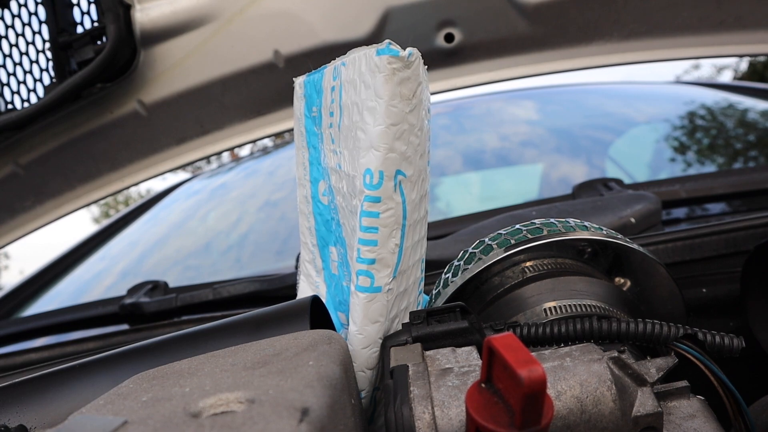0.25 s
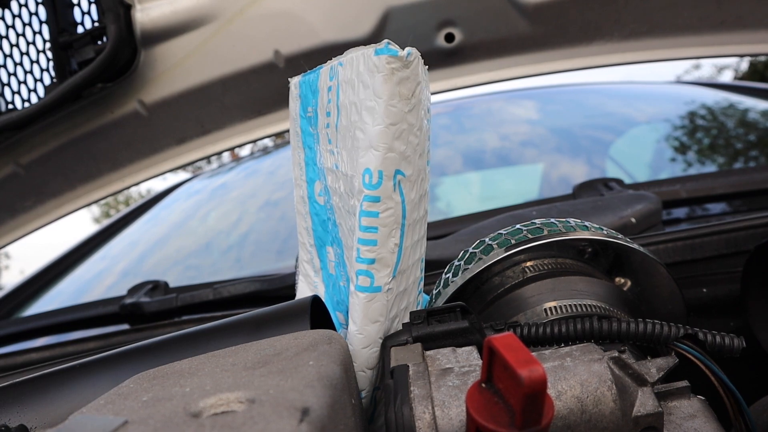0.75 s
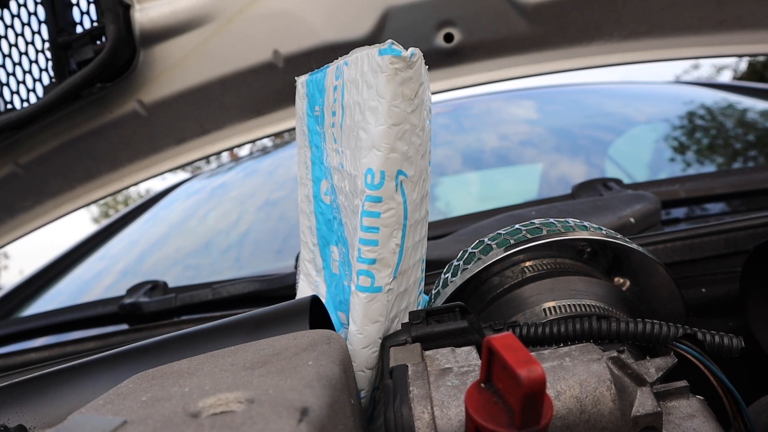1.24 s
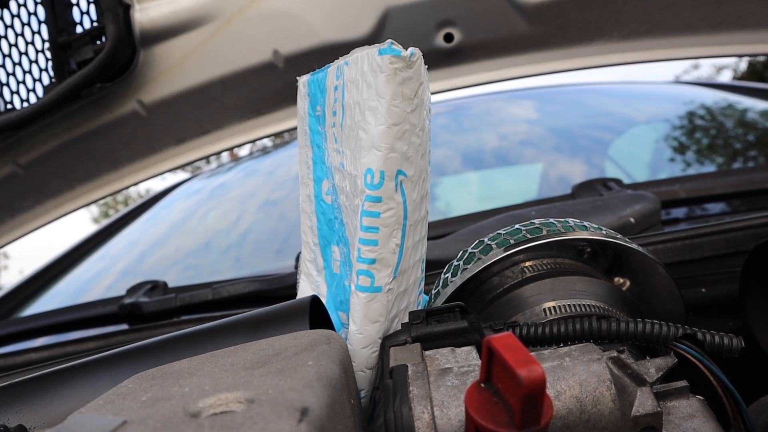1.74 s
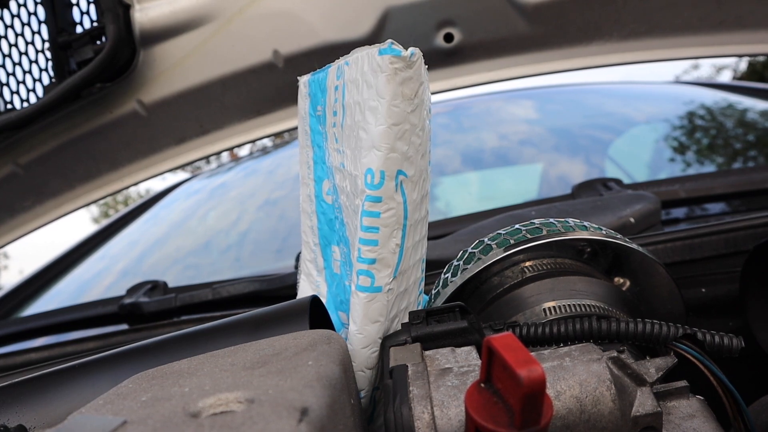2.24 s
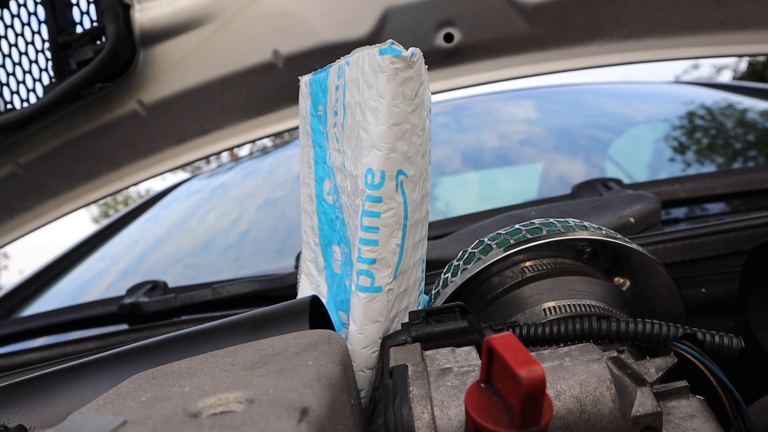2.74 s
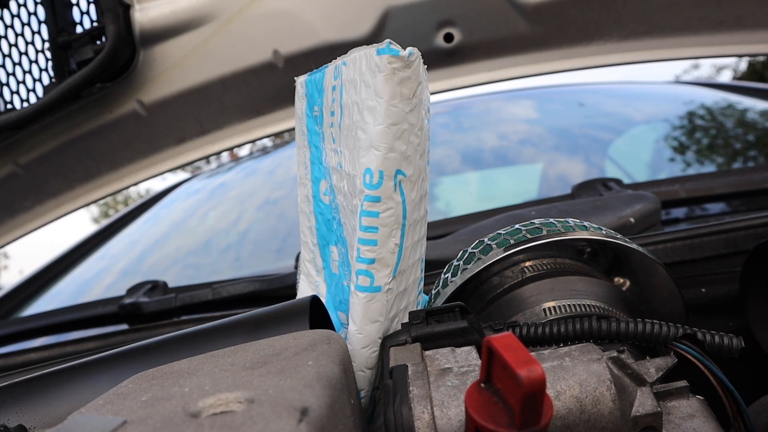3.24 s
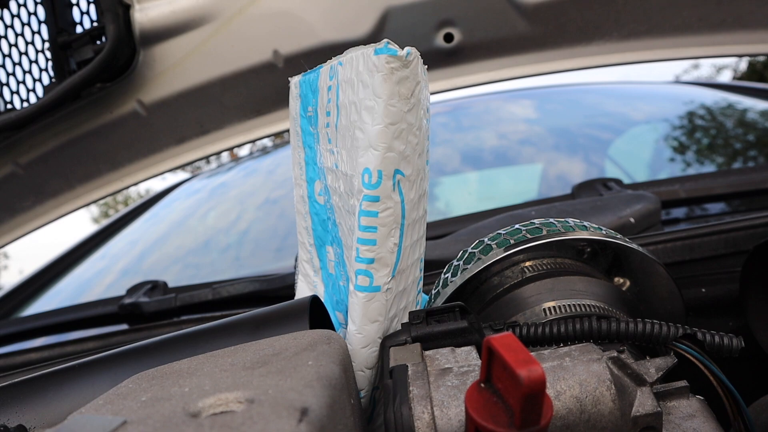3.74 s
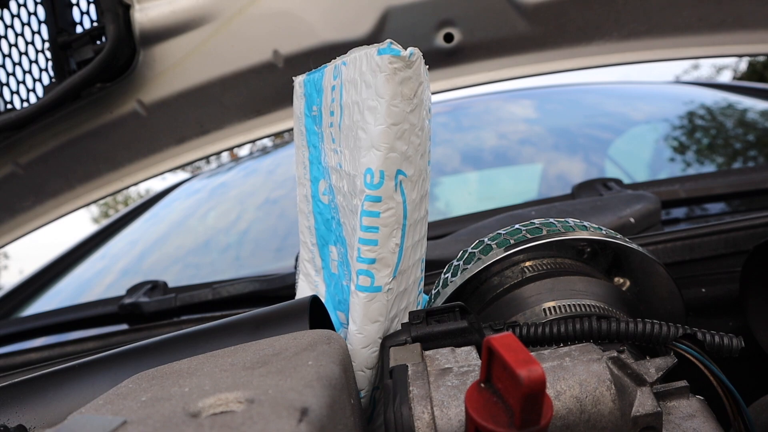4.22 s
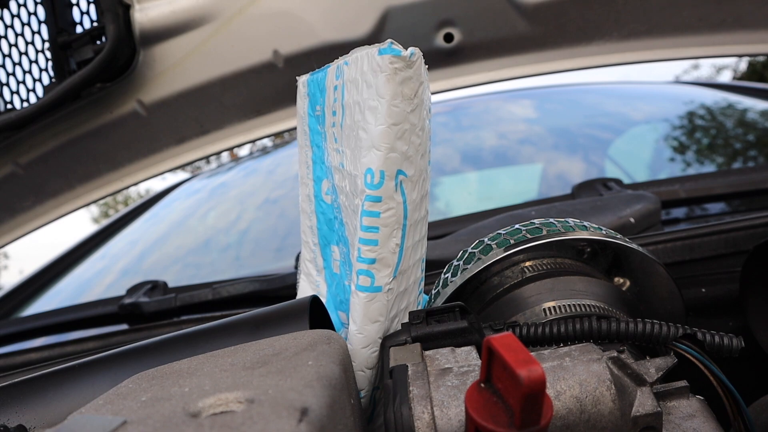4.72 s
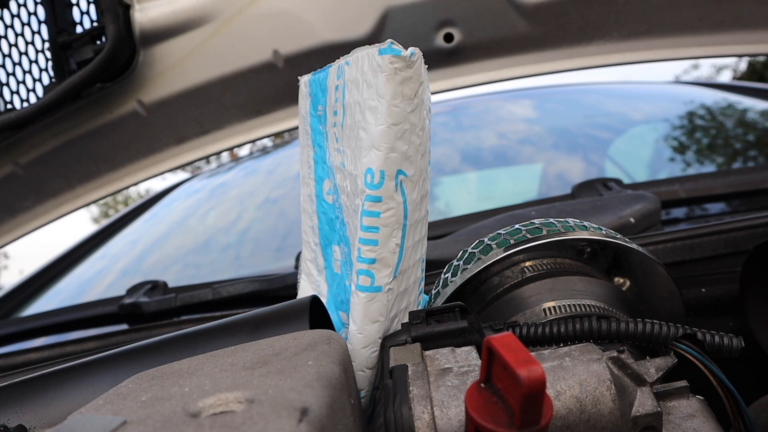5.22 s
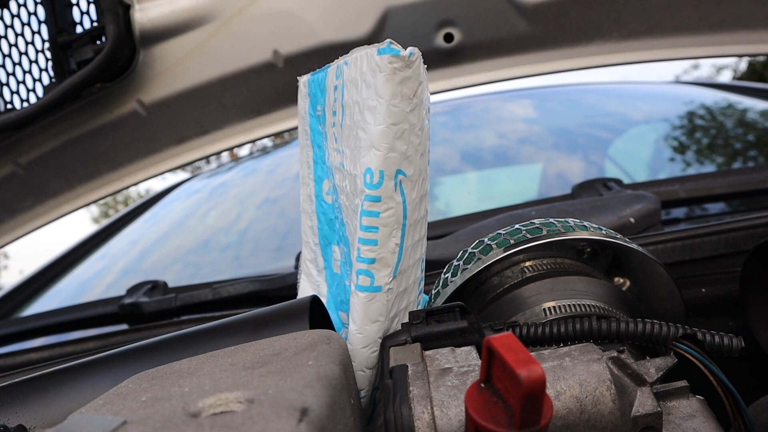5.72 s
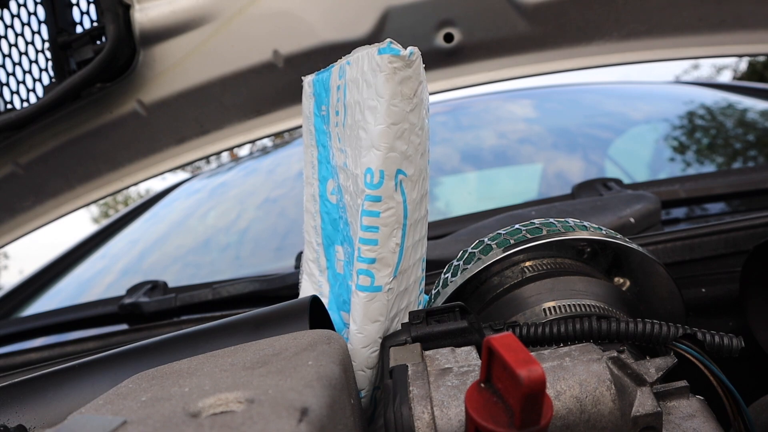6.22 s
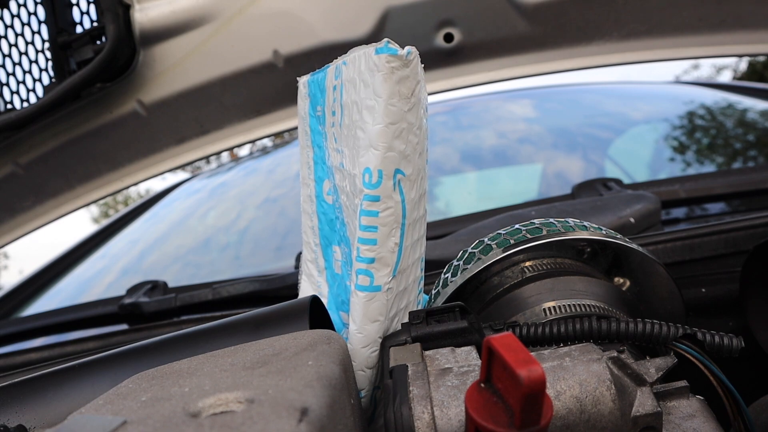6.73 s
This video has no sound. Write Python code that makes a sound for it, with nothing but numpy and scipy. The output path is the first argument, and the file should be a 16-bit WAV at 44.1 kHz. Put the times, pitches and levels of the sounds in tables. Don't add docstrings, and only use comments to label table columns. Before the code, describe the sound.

Close, breathy blower blasts whine up to a high steady pitch, rush through a duct, coast and brake, then roar again with heavy wind buffeting.

```python
import sys
import numpy as np
from scipy import signal
from scipy.fft import rfft, irfft
from scipy.io import wavfile
from scipy.ndimage import uniform_filter1d

SR = 44100
rng = np.random.default_rng(int(sys.argv[2]) if len(sys.argv) > 2 else 0)


def wav_record(signal):
    frames = np.transpose(np.atleast_2d(signal))
    bounded = np.clip(frames, -1, 1)
    quanta = np.round(bounded * 32767).astype(np.int16)
    wavfile.write(sys.argv[1], SR, quanta)


def rack_gain(trim_db):
    fader = np.asarray(trim_db, float)
    return 10 ** (fader / 20)


N = 307200

# (trigger pulled [s], let go [s], full blade rate [Hz])
BLASTS = [
    (-2.3, -.242, 3672),
    (.76, 2.8, 3676),
    (3.802, 6.87, 3662),
]
# (time [s], nearness [dB], turn of fan mouth to microphone [dB])
NOZZLE = [(0, 0.5, -14), (1.3, 0.5, -5), (1.7, 0, 0), (2.3, 0, 4), (2.8, 0, -1), (4.4, 0.5, -5),
          (5.2, -0.5, -4), (5.7, -0.5, -4), (5.85, 0, 0), (6.0, 1, 0), (6.25, 1, 2), (6.5, 5, -0.5),
          (6.6, 3.5, -7), (6.7, 5, 9.5), (6.8, 1.5, 9), (6.86, 4, 3.5), (6.97, 2.5, 17)]
# (frequency [Hz], level [dB])
BLADE_OUT = [
    [(1000, -78), (1450, -44), (2050, -44), (2400, -53), (3150, -25), (3350, -27), (3420, -45), (3660, -38)],
    [(3000, -70), (5400, -55), (6800, -47), (7150, -38), (7340, -31)],
    [(4500, -72), (10600, -60), (11000, -46)],
]
# (share of nearness [1], share of turn [1], slow fading [dB])
BLADE_AIM = [(1.8, -.6, 3), (.5, 1, 3), (-1, -.9, 3)]
# (frequency [Hz], level [dB])
POLE_OUT = [(700, -90), (1400, -58), (1800, -42), (1930, -30), (2020, -26), (2110, -30), (2200, -42),
            (2800, -44)]
# (frequency [Hz], level [dB])
COGGING = [(400, -62), (1070, -46), (1450, -39), (1800, -56), (2070, -30), (2600, -32), (3300, -45),
           (4900, -45)]
# (frequency [Hz], width [Hz], level [dB])
HOUSING = [(984, 48, -1), (1463, 64, 4), (2160, 63, 5), (2460, 70, 1), (3140, 300, -13.5), (4780, 180, -16),
           (5500, 10000, -25)]
# (peak [dB], attack [s], sag [dB/s], end after its cue [s], fall [dB/s])
RATTLE = (-35, .03, 55, .19, 350)
CARRIER = (-51, .012, -25, .18, 250)
COG = (0, .04, 0, .235, 500)
BRAKE_RATTLE = (-49, .05, 40, .2, 300)
BAND_EDGES_HZ = [90, 350, 1150, 3500, 8500, 16500]
# (level at rated speed [dB], power of speed [1], lag [s], share of nearness [1],
# share of eddies [1])
AIR_LAW = [
    (-20, 2.73, 0.038, 0.24, 0.18),
    (-20.5, 2.84, 0.0085, 1.23, 0.15),
    (-21.5, 2.44, 0.0055, 0.97, 0.026),
    (-24.5, 2.67, 0.0055, 0.78, 0.016),
    (-28.5, 4.3, .005, 0.6, 0.024),
]
# (frequency [Hz], level per Hz [dB])
AIR_SLOPE = [(53, -43), (90, -2.5), (145, 5), (204, -0.5), (288, -7.5), (350, -6.5), (905, -10.5),
             (1150, -2.5), (1450, -5), (2340, -21.5), (7170, -20), (7820, -27), (15600, -46)]
# (frequency [Hz], width [Hz], level [dB])
DUCT = [(147.5, 15, 11), (293.7, 56, 14.5), (407, 17, 6), (572, 75, 4), (728, 25, 5.5), (898, 38, 8),
        (1167, 164, -19), (1347, 80, -14.5), (1460, 120, 3), (1545, 24, -12), (1820, 46, -22.5),
        (1883, 100, 6.5), (2076, 224, 6), (2162, 88, -5.5), (2257, 34, 9), (2273, 41, -16), (2482, 90, 2),
        (2717, 33, 8.5), (3247, 29, 8.5), (3350, 84, -3), (4090, 25, 6.5), (4825, 54, 8.5), (5230, 56, 8.5),
        (5840, 55, 7.5), (6200, 17, 9), (6900, 39, 4), (7140, 60, -9), (9440, 170, 5), (9870, 320, 5)]
# (frequency [Hz], width [Hz], level [dB])
NEAR = [(1230, 120, 3.5), (1570, 47, 8.5), (1910, 160, -7.5), (2450, 88, 0), (2470, 85, -9), (2800, 140, 2),
        (3130, 96, -11), (3600, 130, 12.5), (4170, 80, 10), (4300, 60, -3), (5100, 110, 4),
        (5400, 330, -1.5), (6020, 110, 5), (6300, 150, -1), (6900, 80, 8)]
# (start [s], end [s], level [dB])
WHISTLE = [
    (-.1, 0.065, -32),
    (1.3, 1.8, -31),
    (5.82, 6.15, -30),
]
# (time [s], lift [dB])
BUFFET = [(.41, 6), (3.35, 8), (1.5, 11), (1.67, 8.5), (2.02, 4.5), (2.3, 3.5), (2.5, 2), (2.86, 3.5),
          (3.04, 3.5), (4.7, 13.5), (5.04, 7), (5.29, 9.5), (5.63, 9), (5.8, 3.5), (6.02, 10), (6.17, 8),
          (6.32, 13.5), (6.55, 12), (6.75, 5)]
# (frequency [Hz], level per Hz [dB])
YARD = [(20, -30), (60, -18), (95, -2.5), (220, -20), (290, -13), (600, -21.5), (6800, -36.5), (12000, -80)]
# (time [s], level [dB])
FAR_ENGINE = [(0, -66), (.45, -39.5), (.8, -56), (1.0, -44), (3.5, -65), (4.0, -57)]
# (time [s], peak [dB], ring [Hz], rasp [dB])
CLICKS = [
    (0.5194, -54, 1460, 1),
    (0.6908, -46, 5100, -12),
    (0.7044, -47, 5790, 1),
    (0.7244, -52, 1460, -15),
    (0.7621, -44, 2487, -6),
    (3.7319, -44, 5230, -3),
    (3.7494, -51, 5780, -3),
    (3.806, -42, 2150, -3),
]
# (time [s], low edge [Hz], high edge [Hz], level [dB])
FLECKS = [(1.52, 5160, 8300, -4), (1.52, 11800, 13800, -4), (1.78, 9000, 10300, -3),
          (2.08, 12400, 13660, -4), (2.73, 4600, 5750, -5), (2.73, 11800, 15700, -6),
          (3.15, 12500, 14500, -6), (4.45, 6900, 9000, -3), (4.59, 6900, 13100, -5),
          (5.36, 4220, 6400, -2.5), (5.36, 9000, 13100, -2), (5.76, 11000, 13100, 1),
          (5.92, 12500, 15100, -6), (6.01, 5200, 6300, -6), (6.15, 9000, 10500, -4), (6.47, 7600, 9000, -6)]

BLADES, POLES = 13, 10
RATED_HZ, SPEED_WANDER = 3670, .0004
CREEP_HZ, RAMP_HZ_PER_S, HANDOVER_S, SETTLE_S = 20, 6200, .182, .128
COAST_DELAY_S, DRAG_S, BRAKE_AFTER_S, BRAKE_HZ_PER_S = .015, 1.09, .54, 9800
TORQUE_DB, TORQUE_HZ_PER_S = 7, 9000
COG_TWICE_DB, CARRIER_HZ = -10, 10070
NEAR_S = 6.3
WHISTLE_HZ, WHISTLE_FADE_DB_PER_S = 5930, 250
BUFFET_DB, BUFFET_POWER, BUFFET_LAG_S, EDDY_S = -22.5, 3.4, 0.21, 0.062
YARD_DB, FAR_ENGINE_HZ, MIC_HISS_DB = -53.5, 88, -70
INSECT_HZ, INSECT_DB, CHIRP_S, CHIRP_START_S = 9000, -55, .0173, 0.57


def curve(table):
    s, *columns = np.transpose(table)
    return [np.interp(np.arange(N) / SR, s, c) for c in columns]


def unit(x):
    return x / np.sqrt(np.mean(x ** 2))


def coloured(gain):
    hz = np.arange(N // 2 + 1) * SR / N + 1e-3
    return unit(irfft(rfft(rng.standard_normal(N)) * gain(hz), N))


def bell(hz, centre, width):
    return 1 / (1 + (2 * (hz - centre) / width) ** 2)


def modes_db(hz, modes):
    return sum(db * bell(hz, f, w) for f, w, db in modes)


def slope(hz, points):
    f, db = np.transpose(points)
    return rack_gain(np.interp(np.log(hz), np.log(f), db))


def out_db(hz, points):
    return 20 * np.log10(slope(hz, points))


def walk(rate):
    hold = int(SR / rate)
    steps = np.repeat(rng.standard_normal(N // hold + 1), hold)
    return unit(uniform_filter1d(uniform_filter1d(steps, hold), hold)[:N])


def tone(turns, order, db, flicker_db, wobble):
    size = np.sqrt(2) * rack_gain(db + flicker_db * walk(45))
    return size * np.sin(2 * np.pi * order * turns + wobble * walk(30))


def start_db(times, peak_db, attack_s, sag, end_s, fall):
    after = np.arange(N) / SR - np.array(times)[:, None]
    rise = 40 * np.log10(np.clip(after / max(attack_s, .004), 1e-4, 1))
    sagged = sag * np.clip(after - attack_s, 0, end_s)
    fallen = fall * np.clip(after - end_s, 0, None)
    return np.max(peak_db + rise - sagged - fallen, axis=0)


def speed():
    out, t = np.zeros(N), np.arange(N) / SR
    for on, off, full_hz in BLASTS:
        ramp = CREEP_HZ + RAMP_HZ_PER_S * np.minimum(t - on, HANDOVER_S)
        driven = full_hz - (full_hz - ramp) * np.exp(-np.clip(t - on - HANDOVER_S, 0, None) / SETTLE_S)
        coast = driven / (1 + np.clip(t - off - COAST_DELAY_S, 0, None) / DRAG_S)
        braked = coast - BRAKE_HZ_PER_S * np.clip(t - off - BRAKE_AFTER_S, 0, None)
        out += (t > on) * np.clip(braked, 0, None)
    return uniform_filter1d(out, size=1200, mode="nearest") + 1


def flow_db(blade_hz, lag_s):
    keep = np.exp(-1 / (max(lag_s, 1 / SR) * SR))
    late_hz = signal.lfilter([1 - keep], [1, -keep], blade_hz, zi=[keep * blade_hz[0]])[0]
    return 20 * np.log10(late_hz / RATED_HZ)


def eddy_db():
    t = np.arange(N) / SR
    return sum(db * np.exp(-((t - s) / EDDY_S) ** 2) for s, db in BUFFET)


def air(blade_hz):
    out, gust, t = 0, walk(12), np.arange(N) / SR
    near = np.clip((t - NEAR_S) / 0.19, 0, 1)
    near_db = curve(NOZZLE)[0]
    eddies_db = eddy_db()
    for lo, hi, law in zip(BAND_EDGES_HZ, BAND_EDGES_HZ[1:], AIR_LAW):
        rated_db, power, lag_s, share, stir = law

        def path(hz):
            band = 1 / np.sqrt((1 + (lo / hz) ** 12) * (1 + (hz / hi) ** 12))
            return band * slope(hz, AIR_SLOPE) * rack_gain(modes_db(hz, DUCT))

        before = coloured(path)
        after = coloured(lambda hz: path(hz) * rack_gain(modes_db(hz, NEAR)))
        roar = np.sqrt(1 - near) * before + np.sqrt(near) * after
        db = rated_db + power * flow_db(blade_hz, lag_s) + share * near_db + stir * eddies_db
        out = out + roar * rack_gain(db + .5 * gust + .6 * walk(32))
    whistle = coloured(lambda hz: bell(hz, WHISTLE_HZ, 200.))
    whistle_gain = 0
    for start, end, db in WHISTLE:
        outside_s = np.clip(np.maximum(start - t, t - end), 0, None)
        whistle_gain = whistle_gain + rack_gain(db - WHISTLE_FADE_DB_PER_S * outside_s)
    return out + whistle * whistle_gain


def buffet(blade_hz):
    eddies = coloured(lambda hz: (hz / 24) ** 2 / (1 + (hz / 26) ** 3.65) / (1 + (hz / 85) ** 6))
    push_db = BUFFET_DB + BUFFET_POWER * flow_db(blade_hz, BUFFET_LAG_S)
    return eddies * rack_gain(push_db + eddy_db() + 2.4 * walk(13))


def fan(turns, blade_hz):
    near_db, turn_db = curve(NOZZLE)
    steady = np.clip(blade_hz / RATED_HZ, 0, 1) ** 12
    torque = np.clip(np.abs(np.gradient(blade_hz)) * SR / TORQUE_HZ_PER_S, 0, 1)
    blades = 0
    for k, (points, (near, turn, fade_db)) in enumerate(zip(BLADE_OUT, BLADE_AIM), start=1):
        db = out_db(k * blade_hz, points) + near * near_db
        db = db + steady * (turn * turn_db + fade_db * walk(9))
        if k == 1:
            db = db + TORQUE_DB * torque
        blades = blades + tone(turns, order=BLADES * k, db=db - 1, flicker_db=2.0, wobble=.5)
    unbalance_db = -32 + 3.8 * flow_db(blade_hz, 0.061)
    return blades + tone(turns, order=1, db=unbalance_db, flicker_db=-4.5, wobble=0.99)


def housing(hz):
    return np.sqrt(sum(rack_gain(2 * db) * bell(hz, f, w) ** 1.15 for f, w, db in HOUSING))


def motor(turns):
    pulls = [on for on, off, hz in BLASTS]
    brakes = [off + BRAKE_AFTER_S for on, off, hz in BLASTS]
    shaft_hz = np.gradient(turns) * SR

    out = tone(turns, order=POLES, db=out_db(POLES * shaft_hz, POLE_OUT), flicker_db=1.5, wobble=.3)

    cog_db = start_db(pulls, *COG) + out_db(3 * POLES * shaft_hz, COGGING)
    cog_db = cog_db + .6 * modes_db(3 * POLES * shaft_hz, DUCT)
    beat_db = 4.0 * np.sin(2 * np.pi * 1.6 * turns)
    out += tone(turns, order=3 * POLES, db=cog_db + beat_db, flicker_db=2.5, wobble=1.1)
    cog_twice_db = start_db(pulls, *COG) + out_db(6 * POLES * shaft_hz, COGGING) + COG_TWICE_DB
    out += tone(turns, order=6 * POLES, db=cog_twice_db, flicker_db=3.0, wobble=.8)

    rattle_db = np.maximum(start_db(pulls, *RATTLE), start_db(brakes, *BRAKE_RATTLE))
    rattle = coloured(lambda hz: housing(hz) * rack_gain(modes_db(hz, DUCT) / 2) / (1 + (hz / 9500.) ** 8))
    out += rattle * rack_gain(rattle_db + 2.2 * walk(90))

    half_chop = .15 * np.cos(np.pi * POLES * turns)
    full_chop = .25 * np.cos(2 * np.pi * POLES * turns + 2.5 * walk(150))
    carrier = np.sqrt(2) * np.sin(2 * np.pi * CARRIER_HZ * np.arange(N) / SR)
    return out + rack_gain(start_db(pulls, *CARRIER)) * (1 + half_chop + full_chop) * carrier


def yard():
    cycle = (np.arange(N) / SR - CHIRP_START_S) / CHIRP_S % 1
    stroke = np.clip(cycle / .7, 0, 1)
    pitch_hz = INSECT_HZ - 2200 * (stroke - .55) ** 2 + 40 * walk(190)
    song = np.sin(2 * np.pi * np.cumsum(pitch_hz) / SR)
    insect = np.sin(np.pi * stroke) * song * rack_gain(INSECT_DB + 2.0 * walk(54))
    chorus = coloured(lambda hz: bell(hz, 8670.0, 1200.) ** 2) * rack_gain(-65.5)
    engine = coloured(lambda hz: bell(hz, FAR_ENGINE_HZ, 22.)) * rack_gain(curve(FAR_ENGINE)[0])
    hum = coloured(lambda hz: slope(hz, YARD)) * rack_gain(YARD_DB)
    return hum + insect + chorus + engine


def trigger():
    length = 900
    out, t = np.zeros(N), np.arange(length) / SR
    swell = t / 0.0022 * np.exp(1 - t / 0.0036)
    for s, db, hz, rasp_db in CLICKS:
        slow, rough = rng.standard_normal((2, length))
        ring = np.sin(2 * np.pi * hz * t) * (0.39 + unit(uniform_filter1d(slow, size=60)) / 2)
        smooth = uniform_filter1d(uniform_filter1d(rough, size=3), size=3)
        rasp = rack_gain(rasp_db) * np.diff(smooth, prepend=0)
        start = int((s - .002) * SR)
        out[start:start + length] += rack_gain(db) * swell * (ring + rasp)
    return out


def scene():
    blade_hz = speed() * (1 + SPEED_WANDER * walk(6))
    turns = np.cumsum(blade_hz) / BLADES / SR
    mono = air(blade_hz) + buffet(blade_hz) + fan(turns, blade_hz) + motor(turns) + yard() + trigger()
    return np.array([mono, mono])


def top_cut(x):
    return signal.sosfilt(signal.butter(12, 15740, fs=SR, output="sos"), x)


def record(dry):
    soft = np.tanh(0.57 * dry) / 0.63 + rack_gain(MIC_HISS_DB) * rng.standard_normal(N)
    side, size = np.zeros(N), 2048
    hz = np.arange(size // 2 + 1) * SR / size
    for s, lo, hi, db in FLECKS:
        start = int(s * SR) - size // 2
        scrambled = rfft(soft[0, start:start + size]) * np.exp(2j * np.pi * rng.random(len(hz)))
        fleck = irfft(scrambled * (hz > lo) * (hz < hi))
        side[start:start + size] += rack_gain(db) * np.hanning(size) ** .5 * fleck
    return top_cut(soft + side * np.array([[1], [-1]]))


dry = scene()
out = record(dry)
wav_record(out)
```